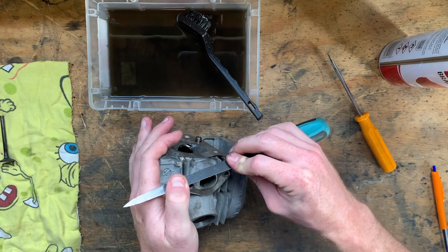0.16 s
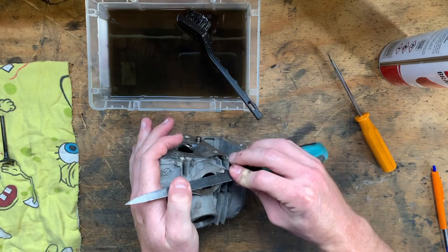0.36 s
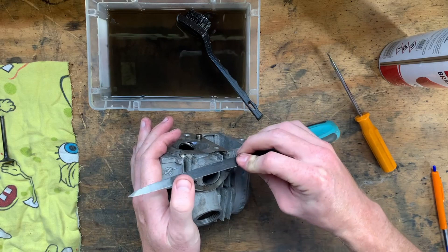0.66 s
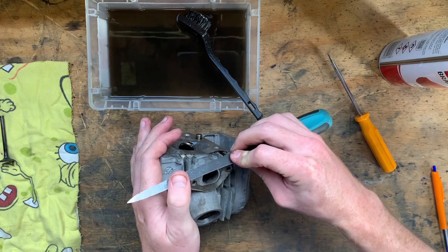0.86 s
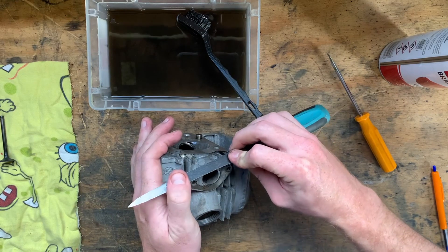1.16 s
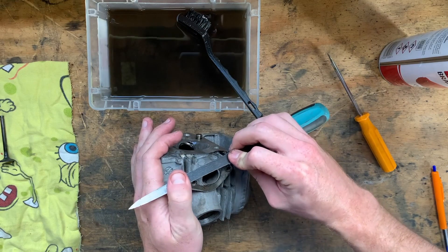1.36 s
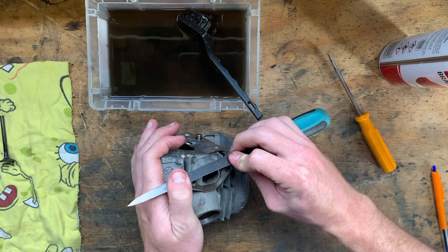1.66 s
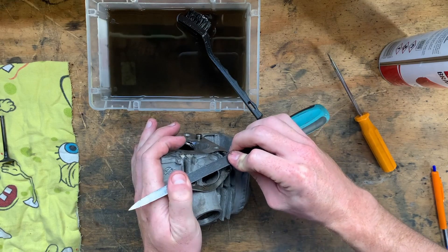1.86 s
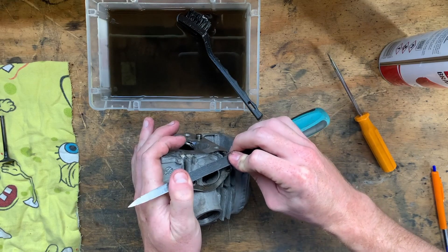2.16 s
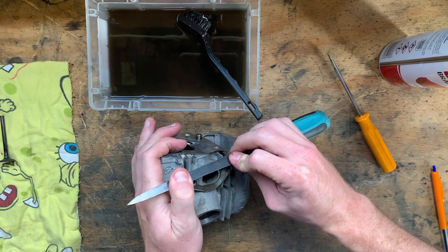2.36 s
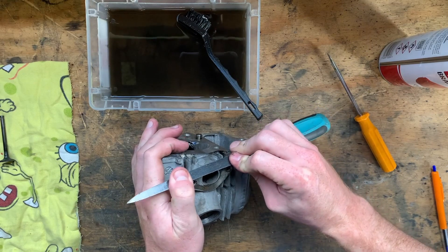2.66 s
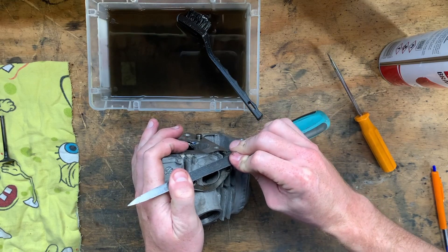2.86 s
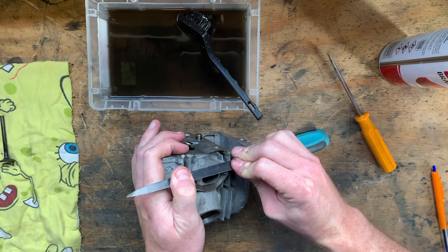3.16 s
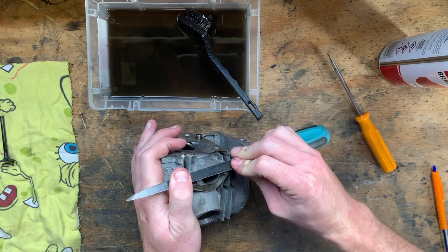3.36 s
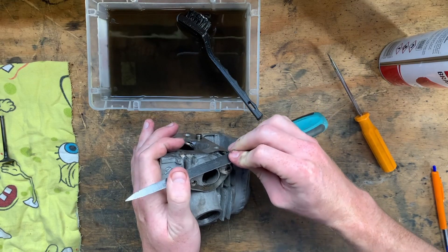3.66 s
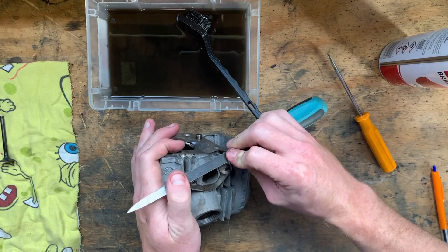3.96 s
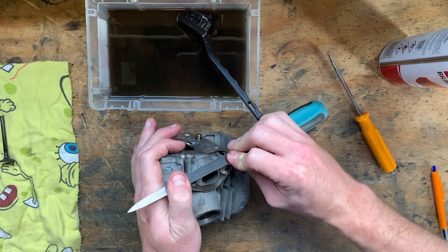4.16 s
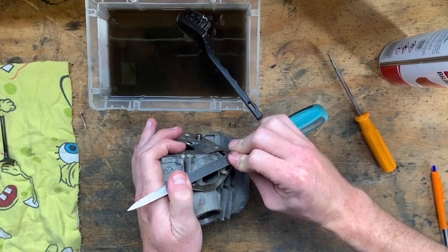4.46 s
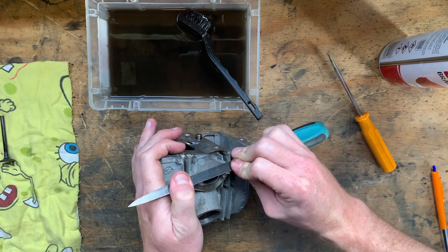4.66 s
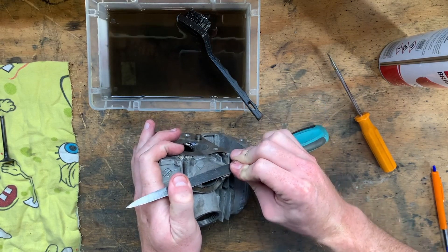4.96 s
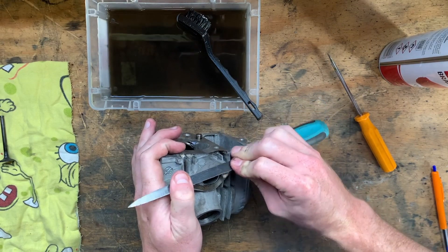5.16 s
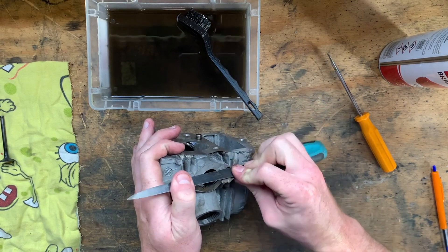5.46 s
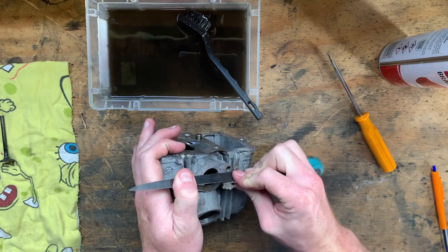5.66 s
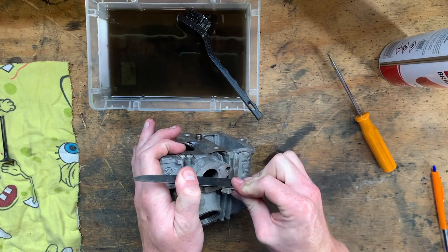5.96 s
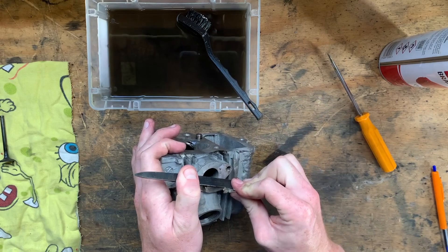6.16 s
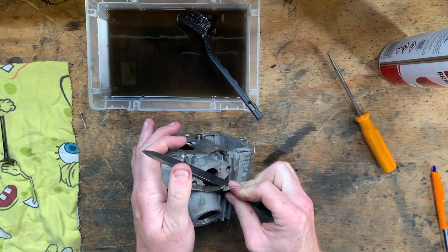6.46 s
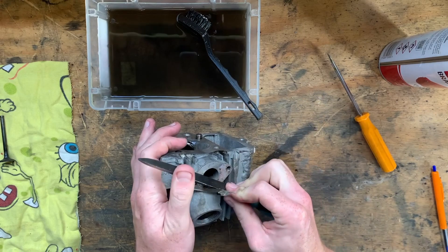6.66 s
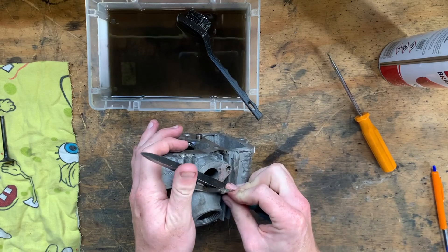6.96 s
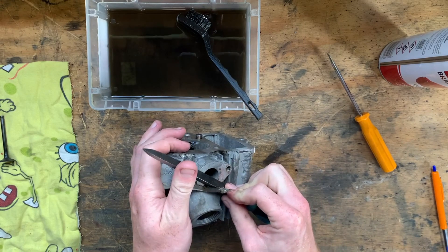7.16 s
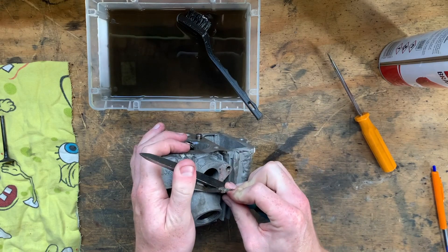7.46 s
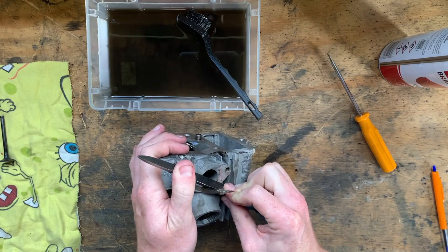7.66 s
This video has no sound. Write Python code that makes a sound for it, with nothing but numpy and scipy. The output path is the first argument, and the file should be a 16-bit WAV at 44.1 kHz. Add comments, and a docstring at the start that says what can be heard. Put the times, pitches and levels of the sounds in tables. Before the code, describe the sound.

Short uneven metal scrapes, crisp ticks and low wooden thumps in a small workshop, over quiet room rumble and faint hiss.

```python
"""Ticks, scrapes and knocks sound over a continuous low room rumble and faint hiss: a steel blade picks old
gasket off a small aluminium cylinder held down on a wooden workbench. Random slips drive the resonances of
bench, casting and blade; brittle crumbs snap, dry rasps come as fibres tear, with a faint smooth hiss at 0.6 s
among them; the casting rocks with dull knocks, the edge whistles and chatters. A camera with two ports hears it
from above in a small room."""
import sys
import numpy as np
from scipy import signal
from scipy.fft import rfft, irfft
from scipy.io import wavfile
from scipy.ndimage import uniform_filter1d

SR = 44100
rng = np.random.default_rng(int(sys.argv[2]) if len(sys.argv) > 2 else 0)


def to_wav(s):
    """Save 16-bit WAV."""
    ch = np.atleast_2d(s).T  # columns
    pcm = np.round(np.clip(ch, -1, 1) * 32767)  # PCM
    wavfile.write(sys.argv[1], SR, pcm.astype(np.int16))


N = 344421  # samples in the scene

SIZE = 16384  # samples around one event
LEAD_S = .13  # part of them that lies before its start
CLOCK = np.arange(SIZE) / SR - LEAD_S  # seconds from the start of an event
FREQ = np.arange(SIZE // 2 + 1) * SR / SIZE + 1e-3  # Hz, kept above zero for the divisions
DETUNE = .008  # random share by which grip and point of contact pull a resonance
# every stroke eases off by EASE_DB while it is held
ATTACK_S, EASE_DB, RELEASE_S = 0.024, 7.5, 0.02


def undb(db):
    """Logarithmic level: decibels become an amplitude gain."""
    return 10 ** (np.asarray(db) / 20)


def along(points, hz):
    """Logarithmic interpolation: read (pitch_hz, value) points on a log-frequency axis."""
    f, value = np.transpose(points)
    return np.interp(np.log(np.maximum(hz, 1)), np.log(f), value)


def unit(x):
    """Normalisation: scale a signal or spectrum to rms 1."""
    return x / np.sqrt(np.mean(np.abs(x) ** 2))


def noise(points):
    """Spectral shaping: white noise is weighted by a colour curve, then set to rms 1."""
    spectrum = rfft(rng.standard_normal(N))
    colour = undb(along(points, np.arange(N // 2 + 1) * SR / N))
    return unit(irfft(spectrum * colour, N))


def shelf(db, edge_hz=8000):
    """Shelving filter: the gain steps by db above an edge."""
    return undb(db / (1 + (edge_hz / FREQ) ** 10))


def resonance(hz, width):
    """Damped oscillator: response of a single mode, gain 1 at its centre."""
    return 1 / (1 + 1j * (FREQ - hz ** 2 / FREQ) / width)


def body(points, modes):
    """Minimum phase: a folded cepstrum makes the broad response causal; the modes are kept beside it."""
    cepstrum = irfft(np.log(undb(along(points, FREQ))))
    cepstrum[1:SIZE // 2] *= 2
    cepstrum[SIZE // 2 + 1:] = 0
    return np.exp(rfft(cepstrum)), modes


def shake(part, force, scatter_db, colour=1):
    """Modal superposition: a force excites every mode, its share and pitch varied by the point of contact."""
    broad, modes = part
    contact = rng.standard_normal((len(modes), 2))
    rings = 0
    for (hz, width, db), (favour, pull) in zip(modes, contact):
        rings = rings + undb(db + scatter_db * favour) * resonance(hz * (1 + DETUNE * pull), width)
    response = unit(broad * (1 + rings) * colour)
    return irfft(rfft(force) * response)


def slide(part, force, hold, scatter_db, colour=1):
    """Moving excitation: as the contact travels, one set of resonances gives way to the next."""
    travel = np.clip(CLOCK / max(hold, .002), 0, 1)
    early = shake(part, force * (1 - travel), scatter_db, colour)
    late = shake(part, force * travel, scatter_db, colour)
    return early + late


def add(track, s, sound):
    """Linear superposition: lay an event into the track at its start."""
    start = int((s - LEAD_S) * SR)
    a, b = max(start, 0), min(start + SIZE, N)
    if a < b:
        track[a:b] += sound[a - start:b - start]


def swell(hold, attack_s, release_s):
    """Pressure envelope: the force rises, eases off while it is held, then lets go."""
    hold = max(hold, .002)
    outside = np.minimum(CLOCK, 0) / attack_s + np.maximum(CLOCK - hold, 0) / release_s
    return np.exp(-outside ** 2) * undb(-EASE_DB * np.clip(CLOCK / hold, 0, 1))


def slips(pressure, rate, spread_db, catch_db, catch_s=.006):
    """Random impulse train: uneven tiny slips come in clumps as the edge catches and lets go."""
    happens = rng.random(SIZE) < rate / SR  # rate: mean slips a second
    direction = rng.choice([-1, 1], SIZE)
    grains = happens * direction * undb(spread_db * rng.standard_normal(SIZE))
    steps = np.arange(SIZE) / (SR * max(catch_s, .001))
    catches = np.interp(steps, np.arange(SIZE), rng.standard_normal(SIZE))
    force = grains * undb(catch_db * catches) * pressure
    # the pressure sets the energy
    return force * np.sqrt(np.sum(pressure ** 2) / (np.sum(force ** 2) + 1e-18))


def blow(crumble, crumble_s, catch_s=0.0028):
    """Impulsive force: a catch, one sharp push and a brief crumbling, with energy 1."""
    spread = np.maximum(np.where(CLOCK < 0, catch_s, crumble_s), 1e-4)
    tail = rng.standard_normal(SIZE) * np.exp(-np.abs(CLOCK) / spread)
    force = crumble * tail / np.linalg.norm(tail)
    force[int(LEAD_S * SR)] += 1  # the push
    return force / np.linalg.norm(force)


# colour of the room rumble: pitch_hz, relative level_db
RUMBLE_COLOUR = [(20, -6.5), (45, 1), (80, 7.5), (150, 3), (300, -4.5), (600, -13.5), (1200, -34.5),
                 (2500, -56.5), (6000, -39), (16000, -45.5)]
RUMBLE_DB = -67.5  # level before the drift


def background(width=.4, drift_db=3.0):
    """Coloured noise: a low room rumble wavers in level, and opposed noise widens it to the sides."""
    drift = np.interp(np.arange(N) / N, np.linspace(0, 1, 64), rng.standard_normal(64))
    side = width * noise(RUMBLE_COLOUR)
    return undb(RUMBLE_DB + drift_db * drift) * (noise(RUMBLE_COLOUR) + np.array([side, -side]))


# colour of the microphone hiss: pitch_hz, relative level_db
HISS_COLOUR = [(200, 13.5), (1000, 6.5), (2000, -2.5), (3000, -5), (5000, -7.5), (8000, -8.5), (10000, -24),
               (11500, -3), (13500, -7.5), (15000, -12.5), (16000, -19.5)]
HISS_DB = -62  # level with the suppressor fully open


def suppressed_hiss(sound, open_db=-33, depth_db=9, slope=0.44, release_db_per_s=90):
    """Downward expansion: a noise suppressor lets hiss through after loud moments, then slowly shuts."""
    power = np.maximum(uniform_filter1d(sound[0] ** 2, size=400), 1e-12)
    fall = release_db_per_s * np.arange(N) / SR
    held_db = np.maximum.accumulate(10 * np.log10(power) + fall) - fall  # falling peak hold
    gain_db = np.clip(slope * (held_db - open_db), -depth_db, 0)
    return undb(HISS_DB + gain_db) * np.array([noise(HISS_COLOUR), noise(HISS_COLOUR)])


# broad response of the steel blade: pitch_hz, relative level_db
BLADE_RESPONSE = [(900, -22), (2200, 3), (3200, 7.5), (4300, 2), (5600, 2), (7000, -1.5), (7700, -1.5),
                  (8900, -8), (10300, -1.5), (12000, 0.5), (13500, 4), (14800, -22), (16000, 4.5)]
# resonances of the blade: pitch_hz, width_hz, level_db above the broad response
BLADE_RINGS = [(3163, 210, 7.2), (4870, 45, 3.2), (6740, 98, 16.9), (7260, 140, 11), (8560, 350, 16.9),
               (13200, 120, 4.4)]
# the edge snaps off a crumb: start_s, blow level_db, high snap boost_db
CRUMB_TICKS = [(.088, -28.5, 0), (0.273, -30, -2), (0.322, -12.5, -6), (2.687, -23, 20), (2.767, -35, 9),
               (3.106, -25.5, 17), (3.136, -27.5, 20), (3.926, -20.5, 7), (4.481, -26, -7),
               (4.592, -15, 15), (4.624, -7, 11), (5.34, -23.5, -7), (5.716, -24.5, -6), (5.891, -38, 17),
               (5.918, -30.5, 16), (6.408, -31, -3), (6.478, -35.5, 4), (6.65, -23, -3),
               (6.728, -17.5, 9.5), (6.787, -25.5, -5), (6.894, -29, 0), (6.954, -19, -3),
               (7.063, -25.5, 3), (7.198, -34, 19), (7.353, -36.5, 18), (7.421, -39.5, 26),
               (7.568, -38.5, 25), (7.657, -37, 22)]


def ticking(blade, snap_hz=9700, snap_width_hz=2800):
    """Brittle fracture: flakes break away with a high snap, and the impulse rings the blade briefly."""
    out = np.zeros(N)
    snap = np.exp(-((FREQ - snap_hz) / snap_width_hz) ** 2)
    thin = shelf(2, edge_hz=9700)  # a light touch favours the high modes
    for s, db, snap_db in CRUMB_TICKS:
        force = blow(crumble=1.05, crumble_s=0.0069, catch_s=0.00081)
        ring = shake(blade, force, scatter_db=4, colour=thin * undb(snap_db * snap))
        add(out, s, undb(db) * ring)
    return out


# broad responses of the wooden bench and the aluminium casting: pitch_hz, relative level_db
BENCH_RESPONSE = [(25, -48.5), (50, -11), (80, 2.5), (150, -0.5), (230, -1), (275, -5.5), (420, -4),
                  (540, -8.5), (800, -31), (1400, -50.5), (3000, -89)]
CASTING_RESPONSE = [(250, -28), (550, 3), (900, 7.5), (1300, -5), (1800, -9.5), (2500, -17), (4500, -13.5),
                    (7000, -34), (15000, -42.5)]
# resonances of bench and casting: pitch_hz, width_hz, level_db above the broad response
BENCH_RINGS = [(80, 17.6, 8), (124, 9.6, 6.5), (171.6, 110, -4.5), (202.7, 75, 15.5), (241.7, 18, 9),
               (329, 31, 19.5), (414.1, 23, 16), (629, 55, 12.5)]
CASTING_RINGS = [(635, 50, 2.5), (780.6, 23, 12.5), (868.5, 88, 13.5), (1065, 21, 7), (1365, 37, 3),
                 (1543, 14, 12), (1670, 110, 8), (1970, 50, 3.2), (3186, 45, 17), (4850, 36, 15)]
# strokes of the blade: start_s (the edge bites), hold_s, bench push level_db, steel scratch level_db
BLADE_STROKES = [(0.091, 0.075, -97.5, -62.5), (0.325, 0.0083, -25.5, -40.5), (0.433, 0.043, -29, -53),
                 (0.553, 0.0065, -81, -56), (1.069, 0.013, -35, -54.5), (1.11, 0.019, -30, -52.5),
                 (1.158, 0.021, -35, -61.5), (1.209, 0.017, -37.5, -71), (1.412, 0.047, -64.5, -60.5),
                 (1.853, 0.055, -55.5, -73), (2.136, 0.049, -53.5, -71), (2.414, 0.094, -50.5, -70),
                 (2.689, 0.053, -40, -65.5), (3.129, 0.033, -31, -54.5), (3.24, 0.047, -44.5, -67),
                 (3.75, 0.051, -44.5, -74), (3.931, 0.086, -42, -64), (4.127, 0.11, -35, -67),
                 (4.169, 0.011, -29.5, -56), (4.466, 0.025, -42, -64.5), (4.598, 0.0082, -33, -52.5),
                 (4.63, 0.027, -29, -37.5), (4.683, 0.025, -34, -76), (5.061, 0.035, -33.5, -48.5),
                 (5.162, 0.096, -46.5, -51), (5.334, 0.01, -35.5, -48), (5.401, 0.16, -36.5, -55.5),
                 (5.685, 0.036, -34, -51), (5.877, 0.12, -45.5, -61), (6.27, 0.046, -41.5, -64),
                 (6.378, 0.029, -41, -61), (6.491, 0.024, -36, -64.5), (6.665, 0.013, -46.5, -57.5),
                 (6.699, 0.046, -43.5, -67), (6.964, 0.092, -40.5, -63), (7.39, 0.04, -57.5, -71.5)]
# the place where the edge works, as it moves round the joint:
# time_s, casting ring_db, steel brightness_db, hardness of the slips as corner_hz
WORKING_PLACE = [(.32, 7, 0, 440), (.45, 10, -1, 326), (1.12, 4.5, -1.5, 417), (1.5, -2.5, 4.5, 210),
                 (2.7, 1.5, 7, 207), (4.1, 7.5, -6, 219), (4.6, 2, 4.5, 205), (5.2, 2, 6.5, 238),
                 (5.7, 3.5, -5, 216), (5.9, -4.5, 4, 225), (6.3, 2.5, 1, 275), (6.7, 10.5, -6, 274),
                 (7.0, -2.5, 0, 149)]
# the casting rings between the push and the scratch: share that follows the scratch, offset
CASTING_SHARE, CASTING_DB = 0.7, -7
# a harder push dulls the steel: dB lost above 8 kHz per dB of push over a medium one
DULLING, MEDIUM_PUSH_DB = 0.096, -30
SLIP_LIFT_DB, SLIP_EDGE_HZ = 2, 137  # quick slips shake the middle of the bench's range more than its bass


def scraping(bench, casting, blade):
    """Friction excitation: judder drives the bench, coarse crumbs the casting and fine grit the blade."""
    out = np.zeros(N)
    place_s, ring_db, sheen_db, hardness_hz = np.transpose(WORKING_PLACE)
    for s, hold, bench_db, blade_db in BLADE_STROKES:
        corner_hz = np.interp(s, place_s, hardness_hz)
        casting_db = bench_db + CASTING_SHARE * (blade_db - bench_db) + CASTING_DB
        casting_db += np.interp(s, place_s, ring_db)
        bright_db = np.interp(s, place_s, sheen_db) - DULLING * (bench_db - MEDIUM_PUSH_DB)
        pressure = swell(hold, ATTACK_S, RELEASE_S)

        judder = slips(pressure, rate=810, spread_db=4.0, catch_db=3.0)
        grit = slips(pressure, rate=5700, spread_db=2.5, catch_db=4.5)
        softness = shelf(-6.5, edge_hz=corner_hz) * shelf(SLIP_LIFT_DB, edge_hz=SLIP_EDGE_HZ)
        rumble = shake(bench, judder, scatter_db=4.0, colour=softness)
        rumble *= np.linalg.norm(pressure) / np.linalg.norm(rumble)  # the push sets the energy
        crumbs = slips(pressure, rate=550, spread_db=5, catch_db=4)
        rasp = slide(casting, crumbs, hold, scatter_db=5.0)
        scratch = slide(blade, grit, hold, scatter_db=5, colour=shelf(bright_db))
        add(out, s, undb(bench_db) * rumble + undb(casting_db) * rasp + undb(blade_db) * scratch)
    return out


# broad response of the fibrous gasket: pitch_hz, relative level_db
GASKET_RESPONSE = [(300, -25.5), (600, -4.5), (850, 4), (1500, -8), (2500, -4.5), (3500, -9.5), (5500, -11),
                   (8000, -14.5), (15000, -26.5)]
# resonances of the gasket: pitch_hz, width_hz, level_db above the broad response
GASKET_RINGS = [(890, 220, 1), (1600, 320, 10), (2096, 130, 2.3), (2710, 300, 8), (3050, 190, 5.7),
                (3900, 140, 6), (4680, 160, 2.4), (8170, 260, 9)]
# dry rasps of the gasket, and among them a faint smooth hiss at 0.602 s:
# start_s, hold_s, level_db, centre of the band pitch_hz, treble_db
RASPS_AND_HISS = [(0.315, 0.028, -38, 900, -4.5), (0.425, 0.021, -37, 1560, 3.5),
                  (0.448, 0.019, -44.5, 1760, 7), (0.602, 0.32, -64, 2910, -37),
                  (1.099, 0.026, -55, 1800, -3), (3.122, 0.031, -58, 1380, 0),
                  (3.768, 0.37, -66.5, 4050, -10), (3.93, 0.16, -56.5, 2690, 7.5),
                  (4.117, 0.14, -52, 3930, -5), (4.589, 0.02, -53, 1630, -6),
                  (4.62, 0.052, -47.5, 1300, -3), (5.151, 0.12, -59.5, 4200, 2.5),
                  (5.675, 0.024, -58, 1660, -2), (6.262, 0.05, -59.5, 2990, -13),
                  (6.374, 0.0083, -56.5, 1810, -6), (6.475, 0.0065, -59, 1770, 2),
                  (6.653, 0.017, -51.5, 1830, 9)]
RASP_ATTACK_S, RASP_RELEASE_S = 0.0096, .014  # fibres catch more abruptly than bare metal
BAND_DB, BAND_WIDTH_HZ, BAND_RISE = 16, 260, .1  # strength, width and share by which the pitch rises


def rasping(gasket):
    """Random impulses through a rising band: tearing fibres rasp drily; one faint event is a smooth hiss."""
    out = np.zeros(N)
    for s, hold, db, band_hz, treble_db in RASPS_AND_HISS:
        pressure = swell(hold, RASP_ATTACK_S, RASP_RELEASE_S)
        grains = slips(pressure, rate=2000, spread_db=6, catch_db=3)
        treble = shelf(treble_db, edge_hz=3600)
        travel = np.clip(CLOCK / max(hold, .002), 0, 1)
        # the first band gives way to a higher one
        for share, hz in ((1 - travel, band_hz), (travel, band_hz * (1 + BAND_RISE))):
            colour = (1 + undb(BAND_DB) * resonance(hz, BAND_WIDTH_HZ)) * treble
            rasp = shake(gasket, grains * share, scatter_db=-1.5, colour=colour)
            add(out, s, undb(db) * rasp)
    return out


# broad response of the casting struck from below: pitch_hz, relative level_db
CASTING_FOOT_RESPONSE = [(300, -24), (650, 10.5), (850, 3), (1100, 2), (1500, -2), (2100, -10), (3200, -5),
                         (4800, -15), (5600, -41), (7000, -22), (10000, -34)]
# the casting rocks onto the wood: start_s, bench level_db, casting level_db,
# contact hardness as corner_hz, favoured ring pitch_hz, favoured ring boost_db
CASTING_KNOCKS = [(0.368, 2.5, -52, 170, 780, 0), (.510, 7, -44, 270, 635, 0),
                  (.896, 6.5, -3.5, 667, 1530, 2), (1.124, -3.5, -15, 900, 934, 16),
                  (1.16, -6, -25, 300, 630, 10), (3.117, -8.5, -21.5, 275, 654, 5),
                  (3.4, -6.5, -32, 480, 1500, 26), (3.71, 0, -22, 550, 760, 26),
                  (4.637, -6, -24, 230, 1510, 12), (5.09, 6.5, -20, 950, 980, 26),
                  (5.322, -6.5, -26, 284, 865, 3), (6.138, 3.5, -26.5, 406, 635, 3),
                  (6.423, -10.5, -30.5, 600, 875, 12), (6.479, -12, -20.5, 400, 675, -4),
                  (6.941, -8, -28.5, 200, 1970, 11)]
ECHO_S, ECHO_DB = 0.0085, -7  # delay and relative level of a short echo of each thud
FAVOURED_WIDTH_HZ = 110  # band of rings that one corner of the casting favours


def knocking(bench, casting):
    """Impact: the tipping casting thuds on the wood, a short echo follows, and the corner that lands selects
    its ring."""
    out = np.zeros(N)
    for s, bench_db, casting_db, corner_hz, ring_hz, ring_db in CASTING_KNOCKS:
        landing = blow(crumble=0.03, crumble_s=0.005)
        thud = shake(bench, landing, scatter_db=1.2, colour=shelf(-12.0, edge_hz=corner_hz))
        rattle = blow(crumble=.9, crumble_s=0.005, catch_s=.002)
        favoured = 1 + undb(ring_db) * resonance(ring_hz, FAVOURED_WIDTH_HZ)
        clank = shake(casting, rattle, scatter_db=3.5, colour=favoured)
        moves_s = s + 0.0013  # the heavy top takes a moment to move
        add(out, moves_s, undb(bench_db) * thud)
        add(out, moves_s + ECHO_S, undb(bench_db + ECHO_DB) * thud)
        add(out, s, undb(casting_db) * clank)
    return out


# the edge whistles on bare metal, a glide through: time_s, pitch_hz, level_db
SQUEAL_GLIDE = [(3.96, 11400, -74), (4.02, 12400, -74), (4.11, 13400, -84), (4.15, 13400, -79),
                (4.23, 11950, -66), (4.28, 11300, -77)]


def squeal(waver=0.035, flutter_db=6):
    """Frequency modulation: a thin whistle glides between pitches while its pitch and level flutter."""
    t = np.arange(N) / SR
    s, hz, db = np.transpose(SQUEAL_GLIDE)
    jitter = unit(uniform_filter1d(rng.standard_normal(N), size=30))
    flutter = flutter_db * unit(uniform_filter1d(rng.standard_normal(N), size=700))
    pitch_hz = np.interp(t, s, hz) * (1 + waver * jitter)
    whistle = unit(np.sin(2 * np.pi * np.cumsum(pitch_hz) / SR))
    sounding = (t > s[0]) * (t < s[-1])
    return whistle * undb(np.interp(t, s, db) + flutter) * sounding


# the edge chatters: start_s, hold_s, slip rate_hz, level_db
CHATTER_BURSTS = [(4.145, 0.05, 186.8, -35.5), (4.588, 0.0097, 213.4, -21.5), (5.329, 0.0057, 204.2, -25),
                  (5.388, 0.031, 207.6, -32.5)]
CHATTER_EDGE_S = 0.0066  # rise and fall of a burst of chatter


def chattering(bench, spread_db=1.0):
    """Stick-slip: nearly periodic slips make the bench answer with a short grunt at their rate."""
    out = np.zeros(N)
    for s, hold, hz, db in CHATTER_BURSTS:
        late, strong = rng.standard_normal((2, SIZE))
        rate_hz = hz * (1 + .04 * unit(uniform_filter1d(late, size=200)))
        turns = np.cumsum(rate_hz) / SR
        pressure = swell(hold, CHATTER_EDGE_S, CHATTER_EDGE_S)
        slip = np.diff(np.floor(turns), prepend=0)  # one impulse a turn
        force = slip * undb(spread_db * strong) * pressure
        grunt = shake(bench, force, scatter_db=0, colour=resonance(hz, width=60))
        add(out, s, undb(db) * grunt * np.linalg.norm(pressure) / np.linalg.norm(grunt))
    return out


# phase by which the left port leads the right: pitch_hz, lead_rad
PORT_LEAD = [(0, 0), (130, -.15), (400, -.35), (800, -.3), (1200, -.9), (1800, -1.1), (2400, -2.5),
             (3600, -2.6), (4400, -.9), (6000, .5), (9200, 3.1), (13000, 6.3), (16000, 8.3)]
# the room by band: pitch_hz, level_db against the direct sound, t60_s, likeness of left and right (0-1)
ROOM_BANDS = [(70, -5, .42, .92), (200, -11, .33, .85), (450, -9, .28, .3), (1000, -5, .27, .1),
              (3000, -6, .21, .1), (7000, -9, .19, .1), (14000, -14, .17, .1)]


def workshop(x, first_echo_s=0.0039):
    """Diffuse reverberation: a short decaying tail follows direct sound that meets the ports out of step."""
    hz, db, t60, likeness = np.transpose(ROOM_BANDS)
    t = np.arange(SIZE) / SR
    tail = np.zeros((2, SIZE))
    for k, own in enumerate(np.eye(len(hz))):
        band = np.sqrt(along(np.c_[hz, own], FREQ))  # overlapping bands whose powers sum to 1
        mid, side = irfft(rfft(rng.standard_normal((2, SIZE))) * band)
        fade = undb(-60 * t / t60[k]) * (t > first_echo_s)
        c = np.clip(likeness[k], 0, 1)
        pair = np.sqrt((1 + c) / 2) * mid + np.sqrt((1 - c) / 2) * np.array([side, -side])
        tail += undb(db[k]) * pair * fade / np.linalg.norm(fade)
    lead = np.interp(np.arange(N // 2 + 1) * SR / N, *np.transpose(PORT_LEAD))
    direct = irfft(rfft(x) * np.exp(.5j * np.array([lead, -lead])), N)
    return direct + signal.fftconvolve(x[None], tail)[:, :N]


def scene():
    """Superposition of sources: blade, gasket, casting and bench sound in the workshop over its rumble."""
    bench = body(BENCH_RESPONSE, BENCH_RINGS)
    casting = body(CASTING_RESPONSE, CASTING_RINGS)
    casting_foot = body(CASTING_FOOT_RESPONSE, CASTING_RINGS)
    blade = body(BLADE_RESPONSE, BLADE_RINGS)
    gasket = body(GASKET_RESPONSE, GASKET_RINGS)
    strokes = scraping(bench, casting, blade) + chattering(bench) + rasping(gasket)
    blows = ticking(blade) + knocking(bench, casting_foot)
    return workshop(strokes + blows + squeal()) + background()


TOP_HZ = 15900  # upper limit of the camera


def record(dry):
    """Band limiting: the camera adds its hiss, and a steep elliptic low-pass cuts the top."""
    low_pass = signal.ellip(8, .2, 70, TOP_HZ, fs=SR, output="sos")
    return signal.sosfilt(low_pass, dry + suppressed_hiss(dry))


dry = scene()
out = record(dry)
to_wav(out)
```